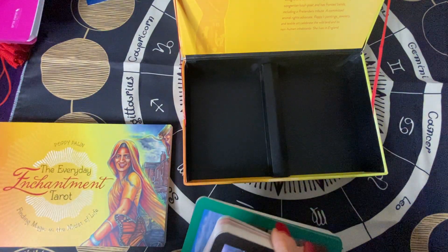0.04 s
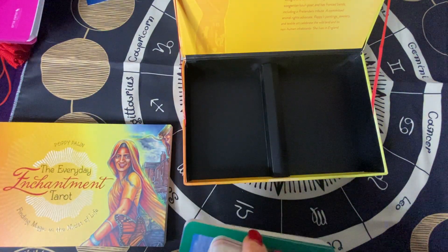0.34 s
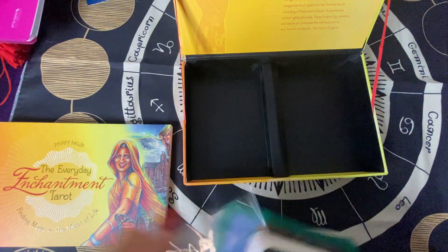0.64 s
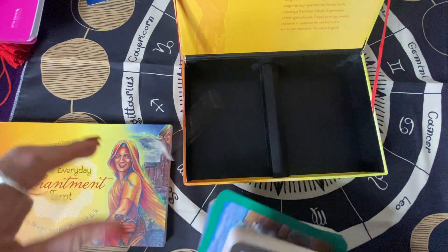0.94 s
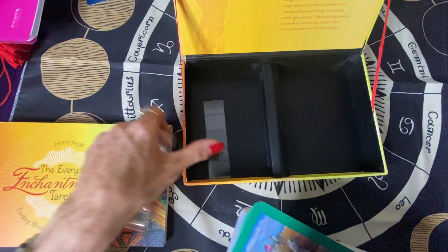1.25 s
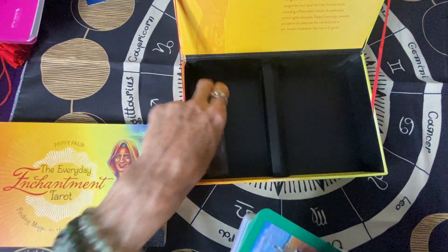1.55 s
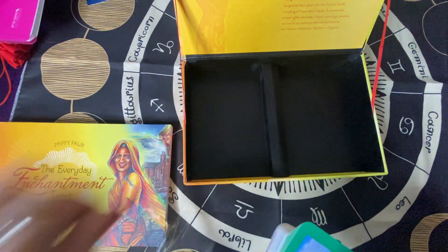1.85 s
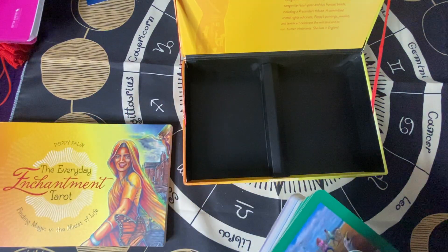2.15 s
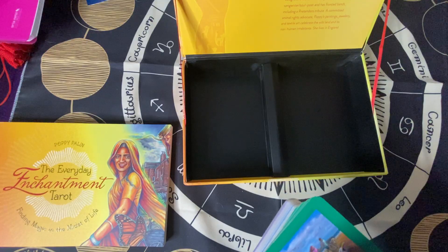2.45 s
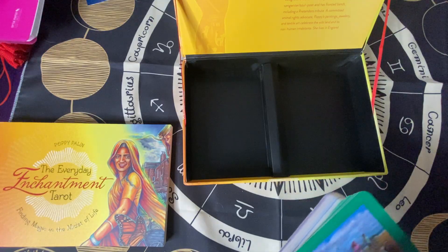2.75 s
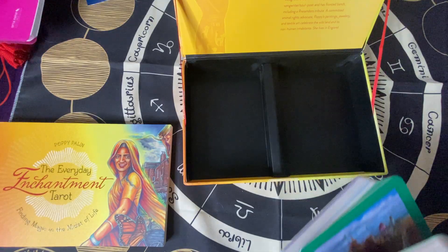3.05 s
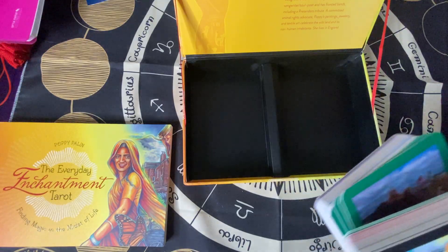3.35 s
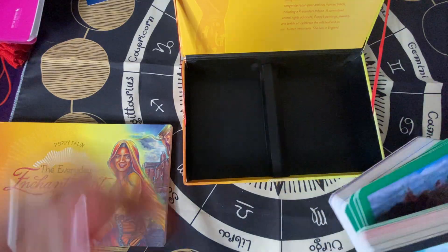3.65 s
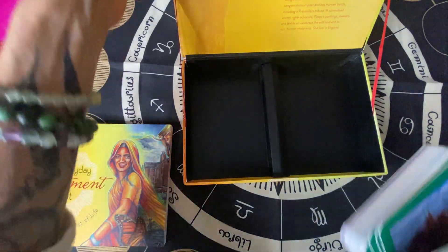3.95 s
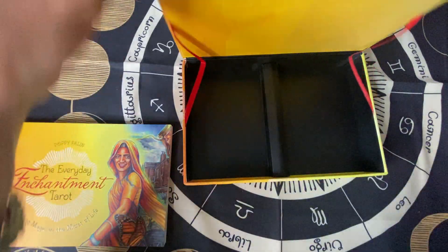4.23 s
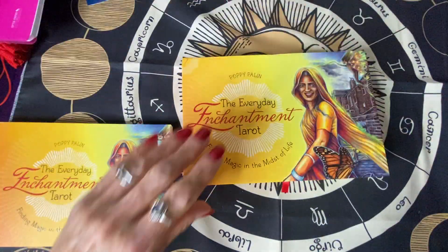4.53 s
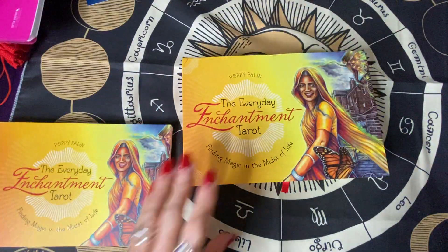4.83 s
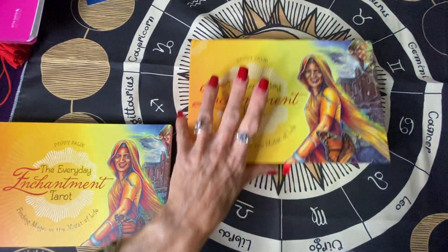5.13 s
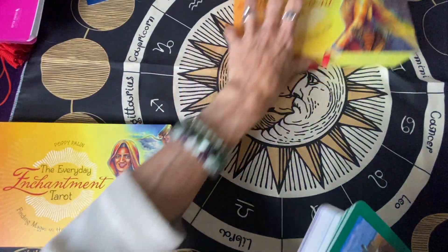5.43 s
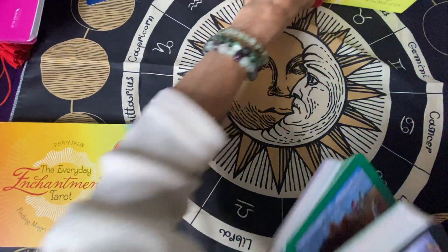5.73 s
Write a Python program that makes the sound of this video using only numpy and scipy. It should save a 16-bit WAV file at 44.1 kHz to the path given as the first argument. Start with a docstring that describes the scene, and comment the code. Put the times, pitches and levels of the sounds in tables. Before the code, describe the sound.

A stiff plastic band snaps sharply off a deck of cards and drops into a cardboard box with light ticks. It crinkles as fingers fish it out, knocking the box. Cards slide over one another with a soft hiss and dull bumps, and fingernails click. The lid falls shut with a soft thud, and the box is pushed away over a cloth-covered table. The handling sounds close, in a small, quiet room.

```python
"""Cards and a hard cardboard box are handled on a cloth-covered table in a small room.
A stiff plastic deck band snaps off, drops into the box and is fished out, crinkling as it buckles.
Cards slide over one another with a hiss of tiny slips, fingernails tick, and knocks set the box and
the table ringing. The lid falls shut with a soft thud and the box is pushed away over the cloth."""
import sys
import numpy as np
from scipy import signal
from scipy.fft import rfft, irfft
from scipy.io import wavfile

SR = 44100
rng = np.random.default_rng(int(sys.argv[2]) if len(sys.argv) > 2 else 0)


def master(y):
    """Save y as 16-bit WAV."""
    cut = np.clip(np.atleast_2d(y).T, -1, 1)
    pcm = np.round(cut * 32767)  # scale
    wavfile.write(sys.argv[1], SR, pcm.astype(np.int16))


N = 255101
TIME = np.arange(N) / SR

# knocks on the box and soft bumps on the table: (time [s], thump level [dB], clack level [dB])
KNOCKS = [(0.626, -51, -34.5), (0.850, -56, -42), (0.901, -77, -40), (1.081, -104, -52), (1.311, -67, -43),
          (1.385, -54, -43.5), (1.567, -33, -20.5), (1.583, -26, -51), (2.650, -43.5, -86),
          (2.79, -45, -79), (2.991, -39.5, -61.5), (3.130, -40, -64), (3.236, -45.5, -66),
          (3.495, -52, -49.5), (4.013, -50, -59), (4.388, -49.5, -52.5), (4.4892, -39, -35.5),
          (5.033, -39, -54.5), (5.072, -38, -49)]
# tone of the plastic band: (frequency [Hz], level [dB])
PLASTIC_TONE = [(150, -14.5), (400, -12), (1000, -6.5), (2000, -5.5), (3200, -4.5), (4500, -1), (6300, 0),
                (7800, -9.5), (11000, -15), (16000, -24.5)]


def from_db(db):
    """Turn decibels into a gain. Every fade time below is the time to drop by 60 dB."""
    return 10 ** (np.asarray(db) / 20)


def rms_one(x):
    """Scale a sound to an average power of one."""
    return x / np.sqrt(np.mean(x ** 2) + 1e-20)


def at_hz(points, hz):
    """Read between the rows of a table, with frequency counted in octaves."""
    table = np.array(points)
    return np.interp(np.log(hz), np.log(table[:, 0]), table[:, 1])


def hump(hz, centre_hz, octaves):
    """A smooth hump of height 1 around one pitch."""
    return np.exp(-(np.log2(hz / centre_hz) / octaves) ** 2)


def tone_filter(tone, shape_db=lambda hz: 0, size=2048):
    """Build a filter of energy one from a tone table and an extra boost or cut."""
    hz = np.maximum(np.arange(size // 2 + 1) * SR / size, 1)
    cepstrum = irfft(np.log(from_db(at_hz(tone, hz) + shape_db(hz))))
    cepstrum[1:size // 2] *= 2  # folded so that the filter never sounds before it is struck
    cepstrum[size // 2 + 1:] = 0
    return rms_one(irfft(np.exp(rfft(cepstrum)))) / np.sqrt(size)


def through(x, impulse_response):
    """Filter a sound, keeping its length."""
    return signal.fftconvolve(x, impulse_response)[:len(x)]


def add(out, s, sound):
    """Mix a sound in, starting at s seconds."""
    start = max(round(s * SR), 0)
    out[start:start + len(sound)] += sound[:N - start]


def ring(clicks, hz, fade_s):
    """Each click starts a pure tone that dies away."""
    decay, angle = from_db(-60 / (fade_s * SR)), 2 * np.pi * hz / SR
    return signal.lfilter([0, np.sin(angle)], [1, -2 * decay * np.cos(angle), decay * decay], clicks + 1e-18)


def friction(count, per_s, spread_db, smooth):
    """Surfaces catch and let go: tiny slips of uneven size over a smooth hiss."""
    sizes = from_db(spread_db * np.minimum(rng.exponential(1, count), 4)) * rng.choice([-1, 1], count)
    slips = sizes * (rng.random(count) < per_s / SR)
    return rms_one(rms_one(slips) + smooth * rng.standard_normal(count))


def held(moves, attack_s, fade_s):
    """Loudness over time of hand movements that swell, hold and die away."""
    gain = np.zeros(N)
    for s, hold_s, level_db in moves:
        swell = np.clip(1 + (TIME - s) / attack_s, 0, 1)
        fade_db = -60 * np.maximum(TIME - s - hold_s, 0) / fade_s
        gain = np.maximum(gain, swell * from_db(level_db + fade_db))
    return gain


def stroke(s, level_db, fade_s, colour):
    """Grainy noise that swells up to time s, faster the louder it is, and dies away."""
    t = np.arange(SR // 2) / SR - .1
    rise_s = 0.0061 * 2 ** ((-44.5 - level_db) / 25)  # time to gain 10 dB
    swell_db = np.where(t < 0, -10 * np.abs(t / rise_s), -60 * t / fade_s)
    grain = friction(len(t), per_s=9000, spread_db=2.5, smooth=1.0)
    out = np.zeros(N)
    add(out, s + t[0], through(grain * from_db(level_db + swell_db), colour))
    return out


def hush(level_db=-59.5):
    """A faint, steady background noise, mostly very low."""
    # tone of the quiet room: (frequency [Hz], level [dB])
    hush_tone = [(6, 11), (14, 10), (25, -5.5), (45, -3.5), (168, -15.5), (600, -20.5), (2200, -29.5),
                 (3200, -31.5), (5400, -31), (8200, -37.5), (15000, -40.5)]
    noise = rng.standard_normal(N + SR)
    return from_db(level_db) * through(noise, tone_filter(hush_tone, size=16384))[SR:]


def rubbing():
    """Cards, sleeve and box rub lightly on the cloth with a fine, even hiss."""
    # steady rubs: (time [s], hold [s], level [dB])
    rubs = [(0.0, .14, -67.5), (0.24, 0.043, -69), (0.395, 0.069, -70), (0.585, 0.017, -68.5),
            (1.04, .24, -70.5), (3.7, .55, -73.5), (4.92, 0.075, -73.5), (5.09, 0.31, -63.5),
            (5.45, .24, -62), (5.77, 0.0072, -66)]
    # tone of the cloth: (frequency [Hz], level [dB])
    cloth_tone = [(150, 2), (400, -3), (1000, -6), (2000, -1), (3500, 0), (5400, 4.5), (6600, -0.5),
                  (8000, -5), (11000, -13), (16000, -20.5)]
    grain = friction(N, per_s=1700, spread_db=8.0, smooth=2.0)
    return through(grain * held(rubs, attack_s=0.059, fade_s=0.17), tone_filter(cloth_tone))


def thumps(puff_db=19.0, puff_low_hz=110):
    """Each knock, and the lid, is a soft push: a dull puff from the panel, then the table rings."""
    # notes of table and box together: (pitch [Hz], level [dB], fade time [s])
    table_notes = [(13.93, -29, 5.7), (29.9, -18.5, 0.77), (51.8, -12.5, 0.2), (92.9, -9.5, 0.067),
                   (133.86, -11, 0.56), (167, -7, 0.043), (204.3, -16.5, 0.133), (261.4, -14.5, 0.27),
                   (338.3, -10.5, 0.14), (362.5, -14.5, 0.28), (454, -25.5, .25)]
    pushes, t = np.zeros(N), np.arange(SR // 16) / SR
    # the more a knock clacks, the shorter its contact and the higher it reaches
    blows = [(s, thump_db, 329 * 2 ** min((clack_db - thump_db) / 28.5, .5))
             for s, thump_db, clack_db in KNOCKS]
    lid = (4.4822, -21.5, 310)  # lands on its cushion of air
    for s, thump_db, contact_hz in blows + [lid]:
        force = t * np.exp(-2 * np.pi * contact_hz * t)
        add(pushes, s, from_db(thump_db) * force / force.sum())
    puff = signal.sosfilt(signal.butter(1, puff_low_hz, "high", fs=SR, output="sos"), pushes)
    ringing = sum(from_db(db) * ring(pushes, hz, fade_s) for hz, db, fade_s in table_notes)
    return from_db(puff_db) * puff + ringing


def clacks(rattle_db=-3.0, rattle_fade_s=0.11):
    """The hard edge of a knock strikes the cardboard walls, which chatter briefly."""
    # notes of the cardboard walls: (pitch [Hz], level [dB], fade time [s])
    wall_notes = [(698, -24.5, 0.0046), (765, -27.5, 0.0198), (1067, -7.5, 0.0084), (1235, -5.5, 0.0097),
                  (1410, -13.5, 0.011), (1730, -14, 0.016), (1947, -16, 0.016), (2800, -13.5, 0.0064)]
    taps, t = np.zeros(N), np.arange(SR // 16) / SR
    for s, _, clack_db in KNOCKS:
        chatter = rng.standard_normal(len(t)) * from_db(-60 * t / rattle_fade_s)
        tap = from_db(rattle_db) * chatter / np.linalg.norm(chatter)
        tap[0] += 1  # the first hit
        add(taps, s, from_db(clack_db) * tap)
    return sum(from_db(db) * ring(taps, hz, fade_s) for hz, db, fade_s in wall_notes)


def slides(sing_db=1.5, sing_share=0.333):
    """Light, fast slides are bright, a thick stack is duller; the sheet sings faintly at one pitch."""
    # card or plastic slides: (time [s], level [dB], fade time [s], tilt [dB/octave], treble limit [Hz])
    quick_slides = [(0.628, -37, 0.093, 1, 11800), (0.638, -29, 0.098, 1, 15100),
                    (0.745, -52, .07, 14, 16000), (1.316, -46, 0.06, 1, 12100),
                    (1.37, -47.5, 0.11, 5.5, 15200), (1.987, -27, 0.036, 6.5, 15100),
                    (2.418, -54, 0.24, -1, 15900), (2.495, -56.5, 0.41, 1.5, 15700),
                    (2.585, -54.5, 0.39, -1, 14300), (2.684, -45, 0.3, 1.6, 15200),
                    (2.772, -45, 0.33, .5, 15300), (3.020, -47, 0.24, -4.5, 4480),
                    (3.046, -46.5, 0.21, -4.5, 5070), (3.432, -65.5, 0.17, -5, 4430),
                    (3.503, -51.5, 0.26, 4, 7500), (4.392, -69, 0.097, -.5, 5980)]
    # tone of a sliding card: (frequency [Hz], level [dB])
    card_tone = [(150, -35), (400, -10), (1000, -11), (2000, -6.5), (3200, -3.5), (4500, -4), (5400, 0),
                 (6500, -7), (7800, -13), (11000, -22), (16000, -28)]
    out = np.zeros(N)
    for s, level_db, fade_s, tilt, limit_hz in quick_slides:
        def shape_db(hz):
            treble_cut = 10 * np.log10(1 + (hz / limit_hz) ** 8)
            singing = sing_db * hump(hz, sing_share * limit_hz, octaves=0.11)
            return tilt * np.log2(hz) - treble_cut + singing
        out += stroke(s, level_db, fade_s, tone_filter(card_tone, shape_db))
    return out


def low_bursts(boost_db=6.0):
    """Dull, low bursts around one pitch: short drags, a hollow knock and the body of the lid's thud."""
    # dull, low bursts: (time [s], level [dB], fade time [s], pitch [Hz])
    bursts = [(0.633, -39, 0.08, 406), (2.113, -65, 1, 373), (2.992, -48, .04, 526),
              (3.034, -46, 0.27, 310), (3.076, -47.5, 0.099, 357), (3.248, -59.5, 0.31, 264),
              (3.506, -49, 0.088, 543), (4.487, -35, 0.055, 350), (5.075, -44, .075, 278)]
    # tone of a low burst: (frequency [Hz], level [dB])
    dull_tone = [(50, -33.5), (130, -10), (220, 4.5), (400, -0.5), (650, -3.5), (1200, -27.5), (4000, -40)]
    out = np.zeros(N)
    for s, level_db, fade_s, pitch_hz in bursts:
        colour = tone_filter(dull_tone, lambda hz: boost_db * hump(hz, pitch_hz, octaves=.45))
        out += stroke(s, level_db, fade_s, colour)
    return out


def snaps(crack=1.2, gain_db=8.5, rise_s=0.00035, fade_cycles=60):
    """A patch of the plastic band buckles: a crack, then brief, dense ringing around its pitch."""
    # snaps of the band: (time [s], level [dB], pitch [Hz], treble boost [dB])
    buckles = [(0.6338, -10.5, 4950, 2.5), (0.6361, -11, 4600, 4), (0.6414, -25, 4600, -11),
               (0.8512, -32, 1390, -9), (0.9, -30, 2440, -11), (1.263, -42.5, 4800, 0),
               (1.3126, -25.5, 5000, -6), (1.3847, -27.5, 5660, 4), (1.483, -34, 5560, -17),
               (1.5837, -17.5, 1970, -0.5), (1.722, -24, 4500, -7), (1.7819, -19, 3750, -4.5),
               (1.8571, -36, 4270, -1), (1.8658, -27, 2650, -18), (1.8944, -15.5, 2740, 1),
               (1.918, -22, 4060, 7), (1.9693, -21, 5500, 15), (1.9796, -23, 5400, 2),
               (1.9865, -22.5, 5200, 5), (2.044, -22.5, 5400, 10), (2.1133, -30, 5750, 9)]
    out, t = np.zeros(N), np.arange(SR // 16) / SR
    for s, level_db, pitch_hz, treble_db in buckles:
        envelope = from_db(-60 * t * pitch_hz / fade_cycles) * (1 - np.exp(-t / rise_s))
        burst = rng.standard_normal(len(t)) * envelope
        burst[SR // 1000] += crack
        patch_db = lambda hz: 10 * hump(hz, pitch_hz, octaves=.55) + treble_db / (1 + (8500 / hz) ** 6)
        snap = through(burst / np.linalg.norm(burst), tone_filter(PLASTIC_TONE, patch_db))
        add(out, s, from_db(level_db + gain_db) * snap)
    return out


def ticks(fade_s=0.025, crack=2.4, gain_db=8.5):
    """A fingernail or card corner slips off an edge: a dry, very bright click."""
    # nail and corner clicks: (time [s], level [dB])
    clicks = [(0.743, -35), (0.753, -32), (0.767, -42), (0.7979, -30.5), (1.032, -32), (1.198, -46),
              (2.977, -45), (3.64, -45.5), (3.889, -36), (4.253, -45.5), (5.241, -39.5)]
    # tone of a fingernail: (frequency [Hz], level [dB])
    nail_tone = [(300, -15), (2000, -55), (4500, 7), (6300, 4.5), (8000, -3.5), (12000, -2.5), (16000, -9)]
    # fainter ticks come by chance while the hands shift their grip
    fidgets = [(rng.uniform(3.55, 4.65), rng.uniform(-52.5, -46.5)) for _ in range(6)]
    out, t = np.zeros(N), np.arange(SR // 32) / SR
    for s, level_db in clicks + fidgets:
        burst = rng.standard_normal(len(t)) * from_db(-60 * t / fade_s)
        burst[0] += crack
        add(out, s, from_db(level_db + gain_db) * burst / np.linalg.norm(burst))
    return through(out, tone_filter(nail_tone))


def crinkle(gain_db=-3.0, buckles_per_s=280, spread_db=1.5):
    """Each little buckle of the band rings at one of many pitches, over the crackling rub of fingers."""
    # fingers grip and crumple the band: (time [s], hold [s], level [dB])
    crumples = [(1.32, .025, -53), (1.40, .025, -52), (1.625, 0.026, -46), (1.72, .15, -50.5),
                (1.90, 0.21, -45)]
    pitches_hz = np.geomspace(1900, 7000, 14)
    sizes = from_db(spread_db * np.minimum(rng.exponential(1, N), 3)) * rng.choice([-1, 1], N)
    clicks = sizes * (rng.random(N) < buckles_per_s / SR)
    chosen = rng.integers(0, len(pitches_hz), N)
    buckles = sum(ring(clicks * (chosen == k), hz, fade_s=0.014) for k, hz in enumerate(pitches_hz))
    rub = friction(N, per_s=700, spread_db=3.5, smooth=.4)
    colour = tone_filter(PLASTIC_TONE)
    grain = rms_one(through(buckles, colour)) + rms_one(through(rub, colour))
    return from_db(gain_db) * rms_one(grain) * held(crumples, attack_s=0.011, fade_s=0.47)


def wafts():
    """The deck or the lid pushes air: the pressure dips, with a swell before and after."""
    # dips in air pressure: (time [s], peak level [dB], width [s])
    dips = [(2.787, -33, 0.05), (2.974, -36, 0.085), (3.173, -25, 0.053), (4.48, -51, 0.0033)]
    out = np.zeros(N)
    for s, peak_db, width_s in dips:
        offset = (TIME - s) / width_s
        out += from_db(peak_db) * (offset ** 2 - 1) * np.exp(-offset ** 2 / 2)
    return out


def room(x, wet_db, bass_db=-7.0, build_s=0.006):
    """Echoes from the walls build up quickly, blur together and die away octave by octave."""
    # how long the room rings: (frequency [Hz], fade time [s])
    fade_times = [(125, 0.95), (400, 0.48), (1500, 0.49), (5000, 0.39), (14000, 0.34)]
    t, tail = TIME[:SR], 0
    edges_hz = np.geomspace(70, 18000, 9)
    for low, high in zip(edges_hz, edges_hz[1:]):
        hz = np.sqrt(low * high)
        decay = from_db(-60 * t / at_hz(fade_times, hz)) * (1 - np.exp(-t / build_s))
        octave = signal.butter(2, [low, high], "band", fs=SR, output="sos")
        band = signal.sosfilt(octave, rng.standard_normal(SR))
        tail = tail + band * decay / np.linalg.norm(decay) * from_db(bass_db / (1 + hz / 500))
    return x + from_db(wet_db) * through(x, tail)


def scene():
    """Handling and thumps echo in the room; wafts of air and a faint hush join them."""
    background = hush()
    handling = snaps() + slides() + crinkle() + ticks() + low_bursts() + clacks() + rubbing()
    return (room(handling, wet_db=-5.5) + room(thumps(), wet_db=-4.0) + wafts() + background)[None]


def record(dry, cutoff_hz=16200):
    """The highest treble is cut off steeply."""
    return signal.sosfilt(signal.ellip(10, .2, 80, cutoff_hz, fs=SR, output="sos"), dry)


dry = scene()
out = record(dry)
master(out)
```